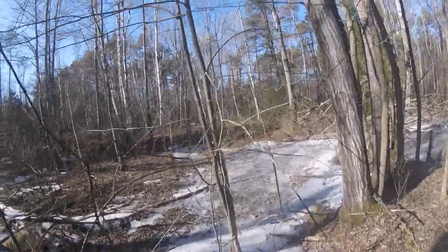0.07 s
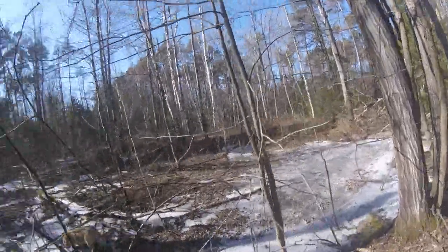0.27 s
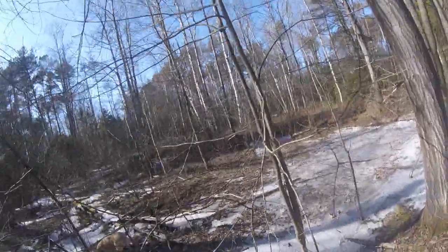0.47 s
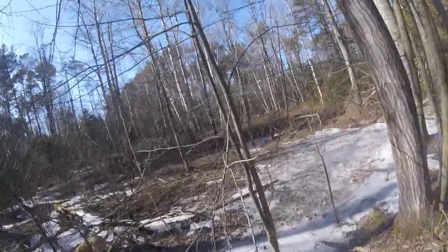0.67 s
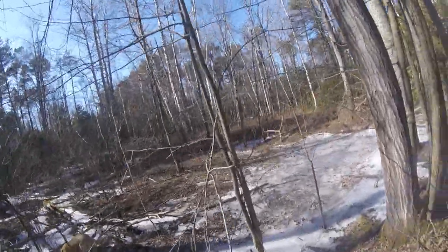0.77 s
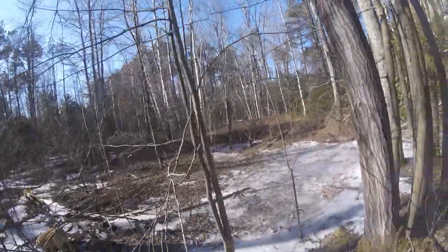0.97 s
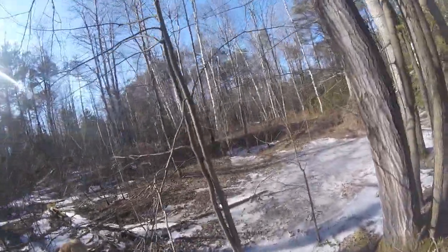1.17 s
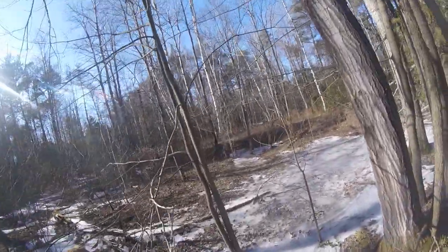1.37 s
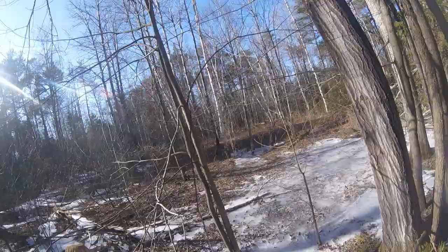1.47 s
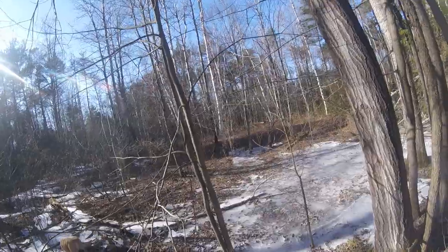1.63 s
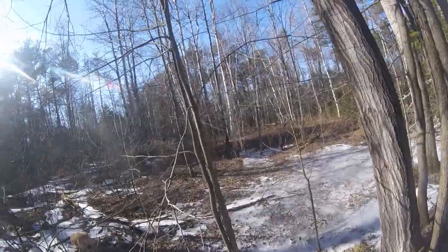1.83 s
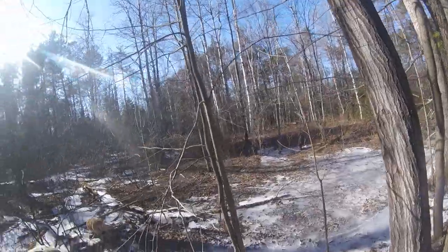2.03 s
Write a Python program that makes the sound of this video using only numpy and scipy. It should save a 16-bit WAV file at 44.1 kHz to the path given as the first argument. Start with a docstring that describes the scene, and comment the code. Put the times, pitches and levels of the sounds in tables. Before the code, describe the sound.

Slow footsteps crunch through crusted snow and dry leaves, with knocks on the microphone.

```python
"""Slow steps through crusted snow and dry leaves in still woods. Moving air rumbles on the microphone port. At
0.25 s a foot crunches the crust, stirs the leaves and snaps twigs; the jolt knocks and rubs a hollow mount
carried by the microphone, which rings and groans. From 0.8 s a second footfall does the same, and packed snow
creaks. After 1.4 s the crunch thins to scattered snaps and soft low thumps; the air swells again near 2 s."""
import sys
import numpy as np
from scipy import signal
from scipy.fft import rfft, irfft
from scipy.io import wavfile
from scipy.ndimage import uniform_filter1d

SR = 44100
rng = np.random.default_rng(int(sys.argv[2]) if len(sys.argv) > 2 else 0)


def bounce(signal):
    """Save signal as a 16-bit WAV file at the path given by the first command-line argument."""
    frames = np.transpose(np.atleast_2d(signal))
    limited = np.clip(frames, -1, 1)
    pcm = np.round(limited * 32767).astype(np.int16)
    wavfile.write(sys.argv[1], SR, pcm)


N = 92610
TIME_S = np.arange(N) / SR


def from_db(db):
    """Decibels to gain."""
    return 10 ** (np.asarray(db) / 20)


def unit_rms(x):
    """Scale to rms 1."""
    return x / np.sqrt(np.mean(x ** 2) + 1e-20)


def envelope(curve):
    """Gain over time from (s, dB) points."""
    return from_db(np.interp(TIME_S, *np.transpose(curve)))


def decay(start_s, decay_s):
    """Instant attack, exponential decay."""
    return (TIME_S >= start_s) * np.exp(-np.maximum(TIME_S - start_s, 0) / decay_s)


def colour(x, spectrum):
    """Minimum-phase filter of unit power gain, shaped by (Hz, dB) points."""
    hz, db = np.transpose(spectrum)
    bins_hz = np.fft.rfftfreq(N, 1 / SR)
    gain = from_db(np.interp(np.log(bins_hz + 1), np.log(hz), db))
    cepstrum = irfft(np.log(unit_rms(gain)), N)
    cepstrum[1:N // 2] *= 2
    cepstrum[N // 2 + 1:] = 0
    impulse_response = irfft(np.exp(rfft(cepstrum)), N)[:SR // 10]
    return signal.fftconvolve(x, impulse_response)[:N]


def resonance(x, hz, width_hz):
    """Two-pole band-pass, peak gain 1."""
    r, w = np.exp(-np.pi * width_hz / SR), 2 * np.pi * hz / SR
    return signal.lfilter(np.array([1, 0, -1]) * (1 - r * r) / 2, [1, -2 * r * np.cos(w), r * r], x + 1e-18)


def butterworth(x, kind, hz, order):
    """Low-pass or high-pass."""
    return signal.sosfilt(signal.butter(order, hz, kind, fs=SR, output="sos"), x)


def grains(per_s, spread_db):
    """Random impulses, many small and a few large; rms 1."""
    sizes = from_db(spread_db * np.minimum(rng.exponential(1, N), 4.5))
    signs = rng.choice([-1, 1], N)
    return unit_rms(sizes * signs * (rng.random(N) < per_s / SR))


def fracture(start_s, decay_s, click_gain):
    """One click, then a dying burst of splinters."""
    click = np.arange(N) == int(start_s * SR)
    return click_gain * click + rng.standard_normal(N) * decay(start_s, decay_s)


def woods(level_db=-66.5):
    """Steady far hush."""
    # Each row: frequency in Hz, relative gain in dB.
    spectrum = [(30, -6), (110, 13.5), (250, -18), (1000, 3.5), (4000, -30), (7000, -12), (11000, -11),
                (14000, -19)]
    return from_db(level_db) * colour(rng.standard_normal(N), spectrum)


def air():
    """Air buffets the port as the walker sways."""
    # Each row: time in seconds, level in dB.
    gusts = [(0, -59), (0.08, -49.5), (0.105, -26), (0.155, -30), (0.19, -41), (0.3, -34), (0.42, -42),
             (0.48, -27), (0.56, -40.5), (0.68, -48.5), (0.84, -46), (0.9, -40), (0.98, -42), (1.25, -41.5),
             (1.4, -53.5), (1.66, -50), (1.955, -55), (1.98, -35), (2.1, -41.5)]
    # Each row: frequency in Hz, relative gain in dB.
    spectrum = [(15, -8), (38, -1), (70, -7.5), (115, -3.5), (160, -15), (260, -20.5), (500, -45),
                (1500, -76)]
    return envelope(gusts) * colour(rng.standard_normal(N), spectrum)


def bumps(hz=65.4):
    """Each soft low thump is one slow swing of pressure."""
    # Each row: centre in seconds, level in dB.
    events = [(0.116, -37), (0.145, -23), (1.424, -33.5), (1.925, -30), (1.978, -27.5), (2.055, -26.5)]
    out = 0
    for centre_s, db in events:
        cycles = (TIME_S - centre_s) * hz
        out += from_db(db) * np.cos(2 * np.pi * cycles) * np.exp(-2 * cycles ** 2)
    return out


def mount(low_force, main_force, high_force):
    """Modes of the hollow mount, driven by band; the high ones alternate in sign."""
    # Each row: frequency in Hz, gain in dB, T60 in seconds.
    modes = [(113.3, -16.5, 0.48), (180, -13, 1), (237.8, -0.5, 0.15), (306.5, -4.5, 0.15),
             (467.9, -4, 0.17), (491, -10.5, 0.067), (615, -5, 0.044), (702, -25, 0.063),
             (901, -21.5, 0.057), (954, -16.5, 0.038), (1217, -28, 0.15), (1740, -22, 0.078),
             (2117, -14, 0.024), (2448, -13, 0.032)]
    out = 0
    for k, (hz, db, t60_s) in enumerate(modes):
        if hz > 800:
            force = (-1) ** (k + 1) * high_force
        else:
            force = low_force if 150 < hz < 350 else main_force
        r, w = np.exp(-np.log(1000) / (t60_s * SR)), 2 * np.pi * hz / SR
        out += from_db(db) * signal.lfilter([0, np.sin(w)], [1, -2 * r * np.cos(w), r * r], force + 1e-18)
    return butterworth(out, "high", hz=68, order=2)


def rubbing(low_db=-9.5, high_db=-4, scuff_db=-3):
    """Dense small slips ring the mount and add a dull scuff while the weight shifts."""
    # Each row: time in seconds, level in dB.
    friction = [(0, -84), (0.12, -65.5), (0.2, -41), (0.235, -51.5), (0.29, -34), (0.34, -31), (0.39, -35),
                (0.475, -31.5), (0.51, -70), (0.66, -59), (0.8, -58.5), (0.9, -31.5), (0.97, -42.5),
                (1.13, -35.5), (1.18, -44), (1.22, -41.5), (1.33, -47.5), (1.42, -68), (1.69, -62),
                (1.73, -50.5), (1.82, -54.5), (1.95, -59.5), (2.1, -73)]
    # Each row: frequency in Hz, relative gain in dB.
    scuff_spectrum = [(150, -17), (260, -9), (380, -24.5), (520, 0.5), (680, -1.5), (820, -15.5),
                      (1200, -22.5), (4000, -54)]
    gain = envelope(friction)
    slips = grains(per_s=2500, spread_db=4) * from_db([[low_db], [0], [high_db]])
    ring = mount(*(slips * gain)) / np.std(mount(*slips))
    scuff = colour(rng.standard_normal(N) * gain, scuff_spectrum)
    return ring + from_db(scuff_db) * scuff


def squeaks(waver_depth=0.0175):
    """Friction catches one mode: a wavering tone builds while it holds, then rings out."""
    # Each row: peak time, rise and release in seconds, pitch in Hz, rms level at the peak in dB.
    events = [(0.29, 0.058, 0.047, 1760, -40), (0.38, 0.029, 0.04, 727, -29.5),
              (0.396, 0.03, 0.008, 467, -26), (0.39, 0.033, 0.016, 1745, -39.5),
              (0.46, 0.026, 0.01, 1738, -34), (0.48, 0.02, 0.019, 470, -19.5),
              (0.45, 0.14, 0.099, 181, -27.5), (0.283, 0.0025, 0.025, 885, -30),
              (1.222, 0.014, 0.024, 470, -31.5)]
    out = 0
    for peak_s, rise_s, release_s, hz, db in events:
        waver = unit_rms(uniform_filter1d(rng.standard_normal(N), size=200))
        phase = 2 * np.pi * np.cumsum(hz * (1 + waver_depth * waver)) / SR
        rise = np.clip(1 + (TIME_S - peak_s) / rise_s, 0, 1) * (TIME_S < peak_s)
        swell = rise + decay(peak_s, release_s)
        out += from_db(db) * swell * np.sqrt(2) * np.sin(phase)
    return out


def knocks():
    """Each jolt gives a short crack and sets the mount ringing."""
    # Each row: start in seconds, then force, low-mode offset, high-mode offset and crack level in dB.
    jolts = [(0.2446, -13, 1, -5, -21), (0.2790, -12.5, -1, 3, -22.5), (0.38, -20.5, -21, -2, -27.5),
             (0.4632, -21, -11, -1, -26), (0.8110, -20, -13, 7, -21), (0.8179, -33, -1, 10, -27.5),
             (0.884, -28.5, -3, 0, -24.5), (0.9183, -37, -1.5, -4, -29), (0.998, -37, -12, 10, -32),
             (1.023, -23.5, -26, -12, -59), (1.0922, -12.5, -17.5, -5, -23), (1.136, -32, -19, -12, -50),
             (1.1932, -32.5, -30, 19, -24), (1.2038, -27.5, -14, 2, -50), (1.8580, -24, -13, -2, -38.5)]
    # Each row: frequency in Hz, relative gain in dB.
    crack_spectrum = [(300, -14), (800, 18), (1500, 8), (3000, 2.5), (4200, -13), (7000, -13), (14000, -58)]
    forces, cracks = np.zeros((3, N)), 0
    for start_s, db, low_db, high_db, crack_db in jolts:
        forces[:, int(start_s * SR)] = from_db([db + low_db, db, db + high_db])
        cracks += from_db(crack_db) * fracture(start_s, decay_s=0.0022, click_gain=3.8)
    return mount(*forces) + colour(cracks, crack_spectrum)


def leaves(hiss_gain=0.39):
    """Dry leaves and ice crystals crackle over a fine hiss of sliding."""
    # Each row: time in seconds, level in dB.
    stirring = [(0, -55.5), (0.11, -49.5), (0.23, -46), (0.3, -48), (0.39, -45), (0.45, -40.5), (0.51, -47),
                (0.6, -50), (0.75, -48), (0.84, -53), (0.9, -35.5), (0.945, -36), (1.02, -43.5),
                (1.09, -42), (1.22, -51.5), (1.28, -47.5), (1.35, -53.5), (1.44, -58), (1.53, -52.5),
                (1.64, -56), (1.68, -50.5), (1.74, -56), (1.9, -62), (1.98, -62.5), (2.07, -51), (2.1, -60)]
    # Each row: frequency in Hz, relative gain in dB.
    spectrum = [(500, 6), (1200, -5.5), (2500, 1.5), (3800, -4), (5000, 3), (6500, 3.5), (8000, -2.5),
                (9600, -8), (11200, -22), (14000, -28)]
    crackle = grains(per_s=4000, spread_db=3.5) + hiss_gain * rng.standard_normal(N)
    return colour(unit_rms(crackle) * envelope(stirring), spectrum)


def snaps(settling_db=-17, settling_s=0.014, broad_mix_db=-7.5):
    """Twigs and stalks break with a broad crack and a pitched burst; the litter settles after."""
    # Each row: start in seconds, burst level in dB, pitch in Hz, weight of the broad crack in dB.
    events = [(0.1340, -27, 6360, -4), (0.2457, -27, 6300, 6), (0.374, -28, 4840, -7),
              (0.409, -31, 5200, -15), (0.4185, -22, 6660, 4.5), (0.435, -28, 5500, -6),
              (0.472, -37, 5030, -8), (0.518, -35, 5170, 11.5), (0.5402, -32.5, 4200, 10.5),
              (0.704, -30.5, 5440, -9), (0.7291, -36, 3300, -7), (0.782, -34.5, 3250, 1),
              (0.8118, -35, 4900, -5), (0.871, -32, 6900, -22), (0.8892, -25, 6000, -6),
              (0.9193, -20, 3360, -5), (0.951, -25, 6540, -17), (1.293, -31.5, 3900, -8),
              (1.3073, -25.5, 6460, -11), (1.3215, -31, 8900, -18), (1.482, -41.5, 2200, 1),
              (1.5363, -36.5, 3320, 3.5), (1.593, -37.5, 2850, -4), (1.6294, -38, 1180, 4),
              (1.656, -22.5, 6300, -9), (1.7045, -46, 1290, 11), (1.7825, -36, 4230, -4),
              (1.8412, -30.5, 5400, -2), (1.9985, -37, 4100, 8)]
    # Each row: frequency in Hz, relative gain in dB.
    splinter_spectrum = [(250, -9), (900, 11), (2000, 7.5), (4000, -3), (7000, 8), (9500, 1), (11500, -19),
                         (14000, -16)]
    pitched, broad = 0, 0
    for start_s, db, hz, broad_db in events:
        settling = from_db(settling_db) * decay(start_s, settling_s) * rng.standard_normal(N)
        burst = from_db(db) * (fracture(start_s, decay_s=0.0018, click_gain=2.2) + settling)
        pitched += 2 * resonance(burst, hz, width_hz=1310)
        broad += from_db(broad_db) * burst
    pitched = butterworth(pitched, "low", hz=9500, order=4)
    return pitched + from_db(broad_mix_db) * colour(broad, splinter_spectrum)


def creaks(width_hz=230, overtone_ratio=1.54, overtone_db=-10.5):
    """Packed snow slips in short ticks with two resonances."""
    # Each row: start in seconds, level in dB, pitch in Hz.
    ticks = [(0.8112, -22.5, 3115), (0.8299, -32.5, 2680), (0.9179, -20, 1690), (1.195, -27.5, 2620),
             (1.2035, -27, 2360), (1.2122, -33, 2440), (1.2257, -37, 2500), (1.2365, -44, 2350),
             (1.265, -31, 2130), (1.3367, -39.5, 2000)]
    out = 0
    for start_s, db, hz in ticks:
        hiss = rng.standard_normal(N)
        overtone = from_db(overtone_db) * resonance(hiss, hz * overtone_ratio, width_hz)
        tone = unit_rms(resonance(hiss, hz, width_hz) + overtone)
        out += from_db(db) * decay(start_s, decay_s=0.0024) * tone
    return butterworth(out, "low", hz=5500, order=2)


def crust(hiss_gain=0.55):
    """The snow crust gives way underfoot in coarse, dull fractures."""
    # Each row: time in seconds, level in dB.
    crushing = [(0, -66), (0.23, -46), (0.29, -30), (0.32, -31.5), (0.35, -41.5), (0.46, -34), (0.505, -62),
                (0.55, -37), (0.57, -62), (0.85, -53), (0.895, -32.5), (0.93, -36.5), (1.03, -40.5),
                (1.15, -42.5), (1.185, -49.5), (1.205, -39.5), (1.27, -36.5), (1.31, -60), (1.335, -45),
                (1.39, -56), (1.6, -58), (1.9, -60), (2.1, -57)]
    # Each row: frequency in Hz, relative gain in dB.
    spectrum = [(250, 14.5), (700, -3), (1300, 5.5), (2500, 0), (3600, -5.5), (6000, -16.5), (14000, -60)]
    crunch = grains(per_s=990, spread_db=4.5) + hiss_gain * rng.standard_normal(N)
    return colour(unit_rms(crunch) * envelope(crushing), spectrum)


def scene():
    """Background, handling noise and footfalls; dry, mono."""
    background = woods() + air()
    handling = bumps() + rubbing() + squeaks() + knocks()
    footfalls = leaves() + snaps() + creaks() + crust()
    return (background + handling + footfalls)[None]


def record(dry):
    """The microphone port rings in the treble; a steep low-pass cuts the top."""
    port_db, cutoff_hz = 6, 13900
    port_ring = from_db(port_db) * resonance(dry, hz=6494, width_hz=91)
    return signal.sosfilt(signal.ellip(10, .2, 80, cutoff_hz, fs=SR, output="sos"), dry + port_ring)


dry = scene()
out = record(dry)
bounce(out)
```